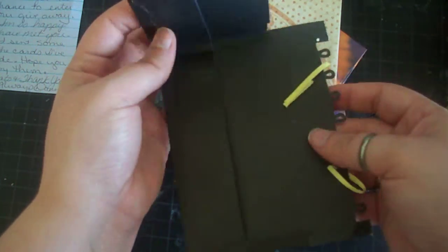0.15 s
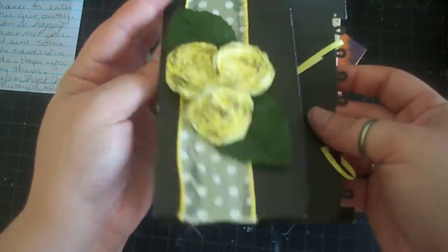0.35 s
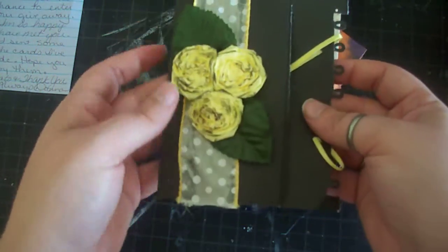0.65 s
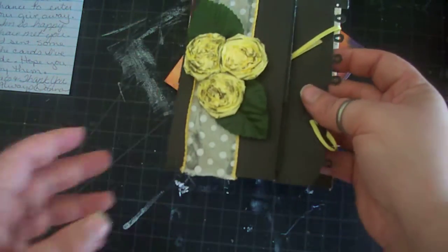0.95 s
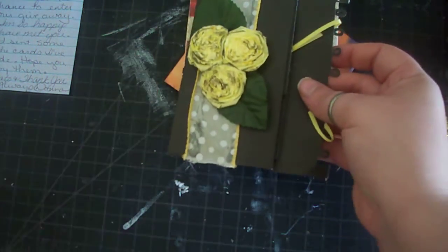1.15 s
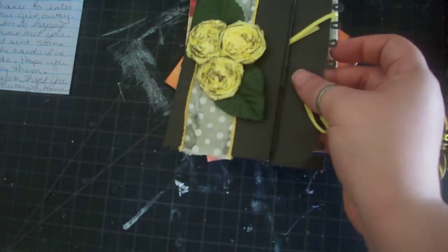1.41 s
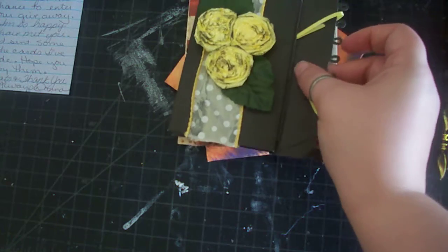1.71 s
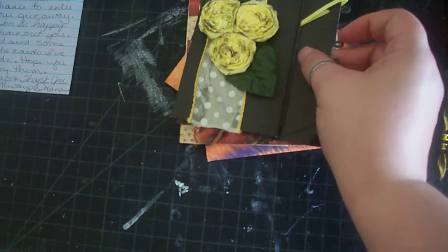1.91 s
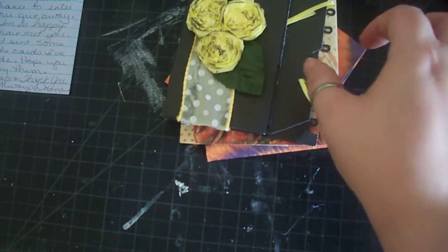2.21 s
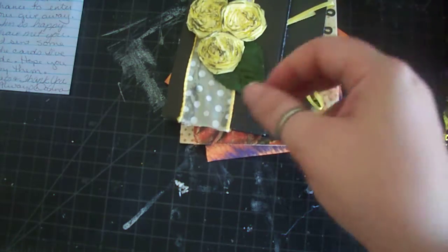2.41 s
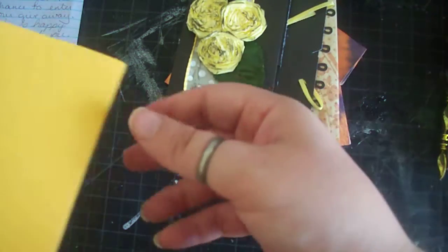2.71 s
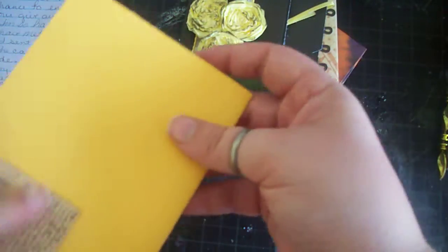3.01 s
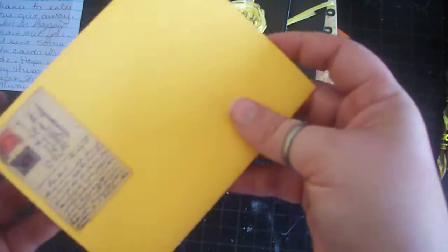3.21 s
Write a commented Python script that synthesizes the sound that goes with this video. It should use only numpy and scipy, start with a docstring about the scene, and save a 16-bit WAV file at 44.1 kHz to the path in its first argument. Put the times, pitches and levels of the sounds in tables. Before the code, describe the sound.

Stiff cardstock is handled close to a small microphone: quick slides and scuffs from 0 to 0.5 s with a crisp snap at 0.4, soft dragging until 0.9, then a quieter stretch. A light tick comes at 1.45, a dense flurry at 1.75-2.2 with the sharpest snap near 2.1, and more ticks at 2.5 and 2.9-3.0. Low traffic rumbles throughout; a far engine rises until 2.3, then drops. Faint bird twitters near 0.7, 2.2 and 3.3.

```python
"""Hands turn a cardstock card over a stack of paper, close to a small microphone, by an open window or outdoors.
Ticks, slides and scuffs are enveloped noise coloured by the card's resonances; slides and scuffs add tiny
catches. The card drags as noise through a hollow. A far vehicle (two sines) revs up and drops back, another
motor idles and a faint hum holds, over a traffic rumble of shaped noise. A small bird twitters in gliding sines."""
import sys
import numpy as np
from scipy import signal
from scipy.fft import rfft, irfft, next_fast_len
from scipy.io import wavfile
from scipy.ndimage import uniform_filter1d

SR = 44100
rng = np.random.default_rng(int(sys.argv[2]) if len(sys.argv) > 2 else 0)


def transcribe(signal):
    """Save signal, clipped to [-1, 1], as a 16-bit WAV file at the path in sys.argv[1]."""
    frames = np.atleast_2d(signal).T
    limited = np.clip(frames, -1, 1)
    pcm = np.round(limited * 32767).astype(np.int16)
    wavfile.write(sys.argv[1], SR, pcm)


def ratio(d):
    """dB to gain"""
    e = np.asarray(d, float) / 20
    return 10 ** e


N = 147735

# card resonances, shared by ticks, slides and scuffs: (centre [Hz], width [Hz], gain [dB])
CARD_MODES = [(990, 540, 9.5), (1590, 360, 6.5), (2580, 750, 2.5), (3750, 960, 4), (5900, 590, -2),
              (7090, 900, 7)]
# sheets slide: (start [s], length [s], top level [dB], centre [Hz], spread [octaves])
SLIDES = [(0, 0.049, -55, 3500, 1.22), (.06, 0.071, -58, 4530, 0.66), (.225, 0.042, -55.5, 4440, 0.6),
          (.335, 0.04, -52.5, 4800, 0.66), (.37, 0.035, -45.5, 3450, 1.43), (.66, 0.16, -61, 5000, 0.9),
          (1.09, .08, -59, 1530, 0.24), (1.05, 0.125, -63.5, 2700, 0.16), (1.41, 0.08, -54.5, 4470, 1.76),
          (1.51, 0.11, -54, 4270, 1.1), (1.69, 0.063, -55, 4160, 1.11), (1.83, 0.067, -52.5, 4600, 1.26),
          (1.89, 0.035, -49, 4520, 1.55), (1.93, 0.1, -53, 5500, 1.35), (2.035, 0.061, -46, 4050, 1.2),
          (2.3, 0.1, -62.5, 5200, 0.66), (2.62, 0.089, -57, 6440, 0.51), (2.685, 0.027, -52, 3414, 1.6),
          (2.82, .05, -66.5, 4000, 1.4), (2.885, 0.03, -64, 5000, 1.3), (3.0, 0.026, -51, 3850, 1.3),
          (3.27, 0.08, -56.5, 550, 0.53), (3.32, 0.035, -57.5, 5000, 1.2)]
# far engine: (time [s], firing rate [Hz], level of 1st multiple [dB], level of 2nd multiple [dB])
ENGINE = [(0, 50.24, -52.5, -49.5), (0.282, 42.37, -51, -59.5), (0.449, 47.83, -60, -52),
          (0.619, 54.92, -49.5, -50), (0.798, 57.63, -46.5, -52), (1.001, 65.25, -45, -66.5),
          (1.201, 73.6, -63, -84), (1.6, 86.47, -51.5, -81.5), (1.9, 96.96, -50.5, -75),
          (2.149, 104.2, -52, -68.5), (2.331, 108.5, -49.5, -85), (2.52, 97.36, -50.5, -91),
          (2.752, 85.2, -55, -67), (2.952, 71.7, -64.5, -79), (3.35, 60, -60, -79)]
# idling motor further off: (time [s], level before IDLE_TRIM_DB [dB])
IDLE = [(0.0, -59), (0.16, -46), (0.49, -63), (0.65, -55.5), (1.41, -54), (1.6, -45.5), (1.65, -53),
        (1.92, -59), (2.03, -42), (2.43, -55.5), (2.5, -43.5), (2.81, -57), (3.0, -40), (3.08, -69),
        (3.26, -43.5), (3.35, -52)]
# traffic and air spectrum: (frequency [Hz], relative density [dB per Hz])
TRAFFIC_SPECTRUM = [(20, -16), (35, -9.5), (55, -4.5), (75, -4), (118, -11.5), (135, -21.5), (250, -24),
                    (600, -30.5), (1500, -34.5), (4000, -39), (7000, -39), (9000, -47)]
# sheets scuff: (start [s], length [s], top level [dB], centre [Hz], spread [octaves])
SCUFFS = [(.102, 0.054, -51.5, 4050, 2.1), (.169, 0.019, -46.5, 4880, 0.52), (.308, 0.033, -57, 5270, 1.1),
          (.412, 0.033, -48.5, 3860, 1.2), (.474, 0.07, -48, 4340, 1.1), (.608, 0.24, -59.5, 3400, 1.045),
          (.82, 0.093, -63, 3340, 0.2), (1.035, 0.21, -61.5, 3400, 0.88), (1.04, 0.047, -63, 1570, 0.23),
          (1.15, 0.085, -65, 1600, 0.22), (1.769, 0.03, -52, 3090, 1.46), (1.787, 0.082, -52.5, 3500, 1.6),
          (2.085, 0.0093, -48, 4000, 1.3), (2.11, 0.032, -51.5, 3480, 1), (2.135, 0.033, -52, 3970, 1.6),
          (2.165, 0.11, -60, 3940, 0.47), (2.492, 0.019, -55, 2570, 0.59), (2.937, 0.037, -53, 3470, 1.3),
          (2.988, 0.015, -48.5, 5470, 0.58), (3.035, 0.077, -57, 3530, 0.92)]
# edges snap: (start [s], level before TICK_SCALE [dB], centre [Hz], spread [octaves], fade scale [ms])
TICKS = [(0.1249, -35, 1800, 1.9, 4.1), (0.3081, -39.5, 3800, 0.65, 1.9), (0.38, -38, 3470, 1.6, 5.9),
         (0.4088, -24, 3490, 1.2, 2.3), (0.4737, -32.5, 1930, 1.1, 2.6), (1.341, -40, 758, 0.51, 5),
         (1.4545, -30.5, 5200, 1.26, 1.8), (1.7693, -36, 1883, 1, 0.81), (1.8925, -35, 2880, 0.6, 2.2),
         (1.909, -38.5, 6500, 0.45, 3.7), (1.918, -48, 3800, 0.34, 2.2), (1.96, -42.5, 205, 0.4, 12),
         (2.0799, -32, 1300, 0.19, 1.28), (2.084, -20, 5600, 0.89, 1.47), (2.097, -39, 4000, 1.08, 3.9),
         (2.1087, -34.5, 3470, 1.3, 5.9), (2.151, -41, 2446, 0.89, 17), (2.158, -40, 324, 0.67, 7.1),
         (2.4905, -29, 3080, 0.74, 1.27), (2.7042, -38, 4970, 0.75, 5.6), (2.918, -46, 1990, 1.8, 3.6),
         (2.924, -27.5, 3290, 0.82, 2.4), (2.925, -44.5, 480, 0.61, 16), (2.9347, -25, 3250, 1.3, 1.46),
         (2.986, -41.5, 2437, 2.34, 7), (3.027, -37, 2970, 0.95, 2.5)]
# card drags on the stack: (start [s], length [s], level before the sag [dB])
DRAGS = [(.14, 0.75, -54.5), (1.85, 0.33, -62.5), (3.25, .3, -58.5)]
# hollow under the card, summed gain applied twice: (centre [Hz], width [Hz], gain per pass [dB])
HOLLOW_MODES = [(265.5, 80, 1.5), (431, 140, 0), (540, 120, -2.5), (860, 70, -2), (1014, 81, -1),
                (1430, 1200, -6)]
# twitter notes: (start [s], length [s], from [Hz], to [Hz], level [dB])
BIRD_NOTES = [(0.654, 0.024, 3980, 3940, -67), (0.688, 0.059, 3290, 3270, -66.5),
              (0.722, 0.019, 3840, 3750, -64.5), (.73, 0.027, 4740, 4930, -64),
              (.77, 0.034, 4560, 3750, -62), (0.812, 0.024, 3020, 3480, -65),
              (2.165, 0.019, 3750, 3700, -63), (2.196, .03, 4580, 4370, -69),
              (2.192, 0.019, 3060, 3170, -64.5), (2.211, 0.022, 3590, 3640, -67.5),
              (3.246, 0.028, 4270, 4220, -63.5), (3.276, .018, 3830, 3790, -66),
              (3.306, 0.026, 3770, 3740, -67), (3.326, 0.019, 4160, 4350, -62)]

CARD_BARE_DB = -6  # the part that does not ring
CATCHES_PER_S, CATCH_SPREAD_DB, CATCH_DB = 500, 3, -6.5
PATCHY_DB, MOTTLE_DB = 1, 2  # rms level wander: overall, per band
SLIDE_RISE_POWER, STOP_S = 0.49, 0.0035
SCUFF_ATTACK_S, SCUFF_SAG = 0.0042, 0.68
TICK_SCALE = 0.37
IDLE_HZ, IDLE_WAVER_HZ, IDLE_TRIM_DB = 55.2, 2.184, -2.0
HUM_HZ, HUM_DB = 119.5, -66
TRAFFIC_DB, SWELL_DB = -51, 1
DRAG_SAG_DB_PER_S, DRAG_RISE_S, DRAG_FALL_S = 6.1, 0.091, 0.17
BIRD_ECHO_DB, BIRD_T60_S, BIRD_WOBBLE = 2, 0.25, 0.042  # wobble: rms fraction of pitch
MIC_TOP_HZ, OFFSET = 7330, 0.0015


def colour(x, gain):
    """Filters x by a gain that is a function of frequency in Hz."""
    n = next_fast_len(len(x))
    hz = np.arange(n // 2 + 1) * SR / n + 1  # +1 keeps logs finite
    return irfft(rfft(x, n) * gain(hz), n)[:len(x)]


def unit(x):
    """Scales to rms 1."""
    return x / np.sqrt(np.mean(x ** 2))


def ring(hz, modes):
    """Gain of broad resonances, summed in power."""
    return np.sqrt(sum(ratio(2 * db) / (1 + (2 * (hz - f) / w) ** 2) for f, w, db in modes))


def walk(steps_per_s):
    """Slow random curve of rms 1: smoothed random steps."""
    k = int(SR / steps_per_s)
    steps = np.repeat(rng.standard_normal(N // k + 1), k)
    return unit(uniform_filter1d(steps, k)[:N])


def place(rows, source, shape, pad=2048):
    """Cuts each event from running noise, colours it by the card and its own brightness, and shapes it."""
    out = np.zeros(N + SR)
    for start_s, length_s, db, centre_hz, octaves in rows:
        i, n = int(start_s * SR), int(length_s * SR) + pad

        def tone(hz):
            card = ring(hz, CARD_MODES) + ratio(CARD_BARE_DB)
            return card * np.exp(-0.5 * (np.log2(hz / centre_hz) / octaves) ** 2)

        env = shape(np.arange(n) / SR, length_s)
        event = unit(colour(source[i:i + n], tone) * env)
        out[i:i + n] += ratio(db) * event * np.sqrt(np.mean(env ** 2))
    return out[:N]


def fibres():
    """Rubbing paper: hiss with tiny catches, patchy overall and in each half-octave band."""
    n = N + SR
    hits = rng.random(n) < CATCHES_PER_S / SR
    sizes = ratio(CATCH_SPREAD_DB * rng.exponential(size=n))
    catches = hits * sizes * rng.choice([-1, 1], n)
    raw = rng.standard_normal(n) + ratio(CATCH_DB) * unit(catches)
    rub = np.zeros(n)
    for centre_hz in 250 * 2 ** (np.arange(12) / 2):
        band = colour(raw, lambda f: np.cos(np.pi / 2 * np.clip(np.log2(f / centre_hz) * 2, -1, 1)) ** 2)
        rub += np.resize(ratio(MOTTLE_DB * walk(45)), n) * band
    return np.resize(ratio(PATCHY_DB * walk(90)), n) * rub


def slides():
    """Sheets slide: the rub swells, then stops."""
    def shape(t, length_s):
        swell = np.minimum(t / length_s, 1) ** SLIDE_RISE_POWER
        return swell * np.exp(-np.maximum(t - length_s, 0) / (STOP_S + 0.055 * length_s))

    return place(SLIDES, fibres(), shape)


def engine(t):
    """Only the two lowest multiples of the firing rate carry this far, wavering."""
    s, hz, first_db, second_db = np.array(ENGINE).T
    firing_hz = np.interp(t, s, hz) * (1 + 0.007 * walk(12))
    phase = 2 * np.pi * np.cumsum(firing_hz) / SR + 6 * rng.random()
    first = ratio(np.interp(t, s, first_db) + 0.94 * walk(12)) * np.sin(phase)
    second = ratio(np.interp(t, s, second_db) + 1.7 * walk(9.2)) * np.sin(2 * phase)
    return np.sqrt(2) * (first + second)


def idle(t):
    """A motor further off: one low sine of wavering pitch that comes and goes."""
    s, db = np.array(IDLE).T
    tone = np.sin(2 * np.pi * np.cumsum(IDLE_HZ + IDLE_WAVER_HZ * walk(8)) / SR)
    return np.sqrt(2) * ratio(np.interp(t, s, db) + IDLE_TRIM_DB) * tone


def hum(t):
    """A faint sine of fixed pitch, its level wandering slowly."""
    return np.sqrt(2) * ratio(HUM_DB + 2 * walk(3.3)) * np.sin(2 * np.pi * HUM_HZ * t)


def traffic():
    """Shaped noise: rumble and thin air hiss; the bass swells slowly."""
    hz, db = np.array(TRAFFIC_SPECTRUM).T
    shaped = colour(rng.standard_normal(N), lambda f: ratio(np.interp(np.log(f), np.log(hz), db)))
    noise = ratio(TRAFFIC_DB) * unit(shaped)
    bass = colour(noise, lambda f: 1 / (1 + (f / 130) ** 8))
    return noise + bass * (ratio(SWELL_DB * walk(2.5)) - 1)


def scuffs():
    """Sheets scuff: the rub starts suddenly, sags, then stops."""
    def shape(t, length_s):
        attack = np.minimum(t / SCUFF_ATTACK_S, 1)
        sag = np.clip(1 - SCUFF_SAG * t / length_s, 0, 1)
        return attack * sag * np.exp(-np.maximum(t - length_s, 0) / STOP_S)

    return place(SCUFFS, fibres(), shape)


def ticks():
    """Edges snap: noise bursts with a fast rise, a brief hold and an exponential fade."""
    def shape(t, fade_s):
        rise = np.minimum(t / (0.088 * fade_s), 1)
        return TICK_SCALE * rise * np.exp(-np.maximum(t - 0.55 * fade_s, 0) / (0.9 * fade_s))

    rows = [(s, fade_ms / 1000, db, hz, octaves) for s, db, hz, octaves, fade_ms in TICKS]
    return place(rows, rng.standard_normal(N + SR), shape)


def drag(t):
    """A dull hush through the hollow under the card: it rises, sags and falls away."""
    env = np.zeros(N)
    for s, length_s, db in DRAGS:
        ramps = np.minimum((t - s) / DRAG_RISE_S, (s + length_s - t) / DRAG_FALL_S)
        env += ratio(db - DRAG_SAG_DB_PER_S * (t - s)) * np.clip(ramps, 0, 1)
    hush = unit(colour(rng.standard_normal(N), lambda f: ring(f, HOLLOW_MODES) ** 2))
    return env * ratio(1.2 * walk(30)) * hush


def bird(t):
    """Short gliding near-sine notes, smeared by echoes (decaying noise)."""
    notes, wobble = np.zeros(N), 1 + BIRD_WOBBLE * walk(250)
    for s, length_s, from_hz, to_hz, db in BIRD_NOTES:
        u = np.clip((t - s) / length_s, 0, 1)
        phase = 2 * np.pi * np.cumsum((from_hz + (to_hz - from_hz) * u) * wobble) / SR
        notes += ratio(db) * np.sqrt(2 * np.sin(np.pi * u)) * np.sin(phase)
    tail = rng.standard_normal(SR // 4) * ratio(-60 * t[:SR // 4] / BIRD_T60_S)
    echo = signal.fftconvolve(notes, tail / np.sqrt(np.sum(tail ** 2)))[:N]
    return notes + ratio(BIRD_ECHO_DB) * echo


def scene():
    """Everything reaches one microphone."""
    t = np.arange(N) / SR
    paper = slides() + scuffs() + ticks()
    background = engine(t) + idle(t) + hum(t) + traffic()
    return (paper + drag(t) + background + bird(t))[None]


def top_cut(x):
    """Nothing passes above the cut-off."""
    return signal.sosfilt(signal.butter(12, 8990, fs=SR, output="sos"), x)


def record(dry):
    """The microphone chain rolls off the top and adds a small constant offset."""
    def rolloff(hz):
        return 1 / np.sqrt(1 + (hz / MIC_TOP_HZ) ** 16) / (1 + (hz / 8960) ** 140)

    mix = colour(dry[0], rolloff)[None] + OFFSET
    return top_cut(mix)


dry = scene()
out = record(dry)
transcribe(out)
```